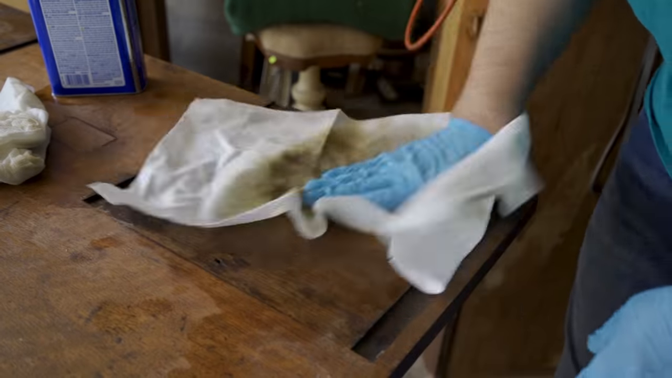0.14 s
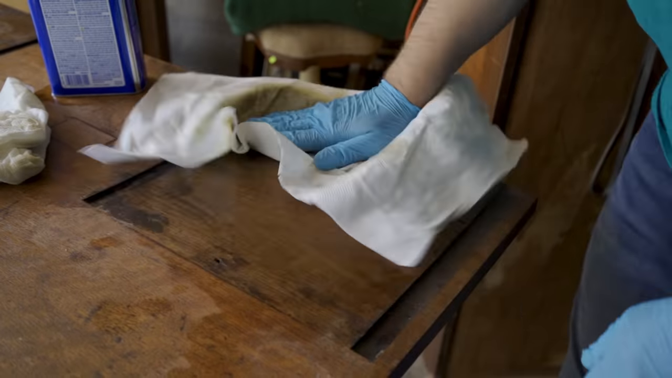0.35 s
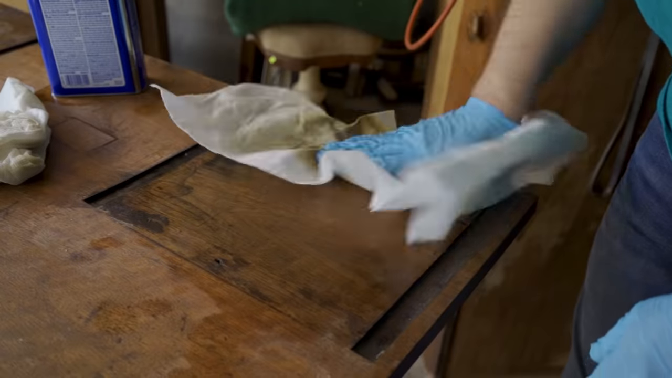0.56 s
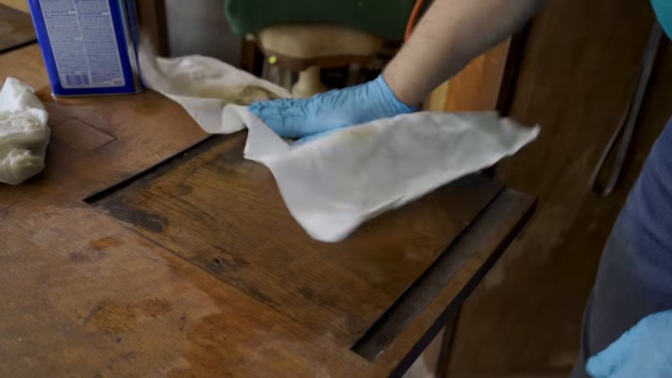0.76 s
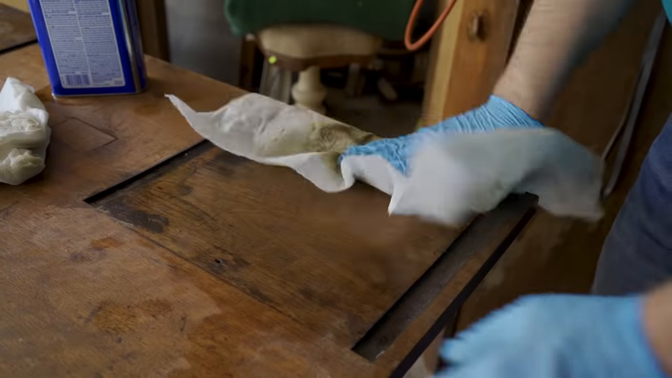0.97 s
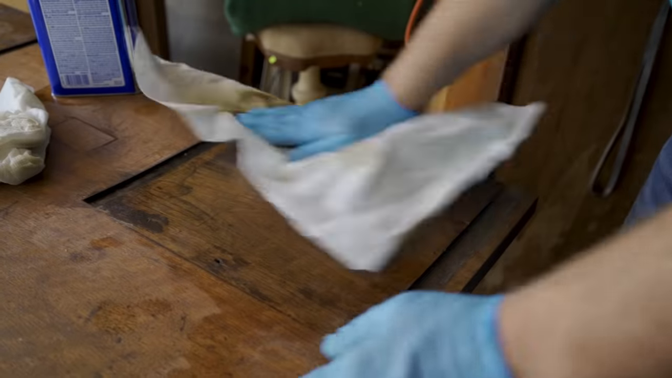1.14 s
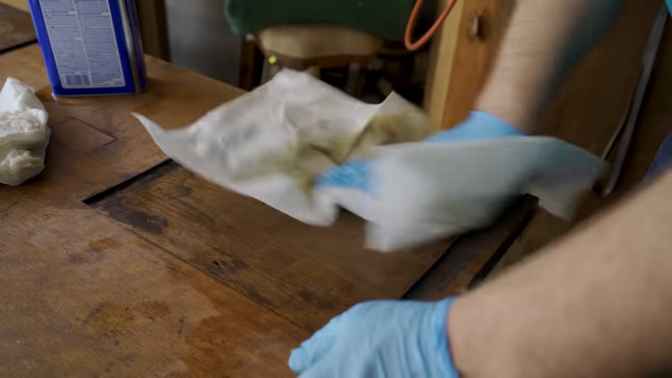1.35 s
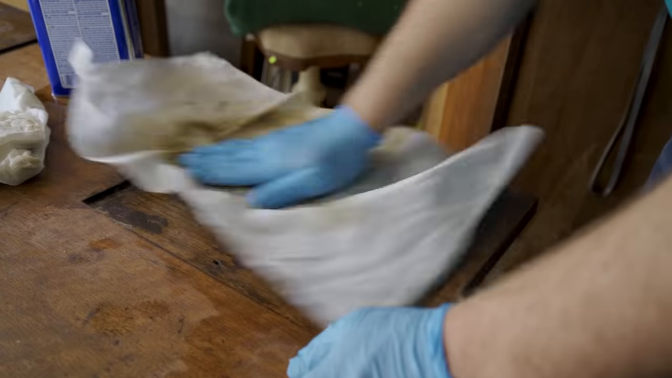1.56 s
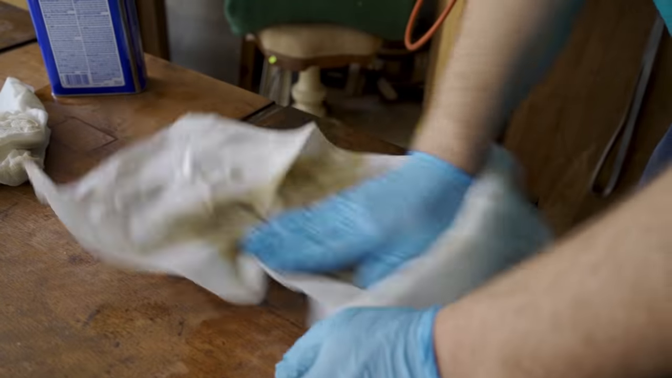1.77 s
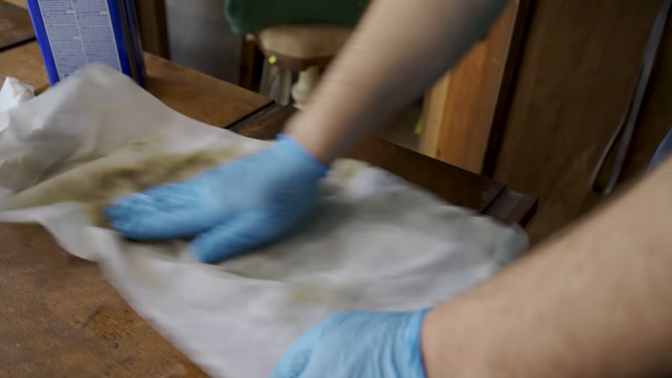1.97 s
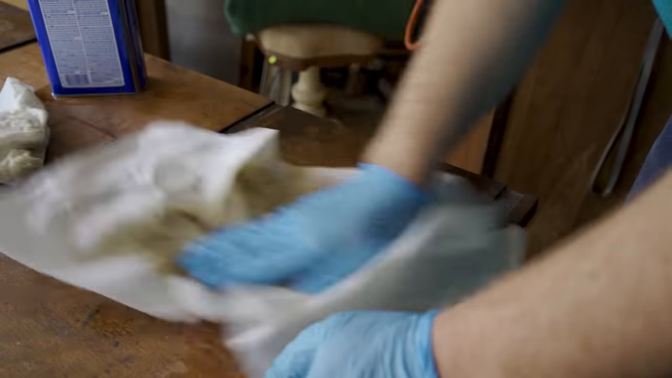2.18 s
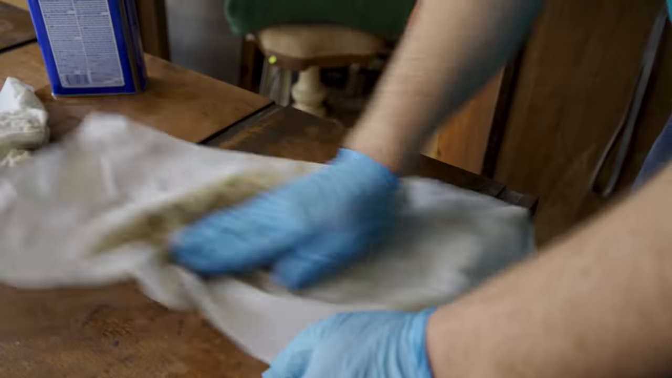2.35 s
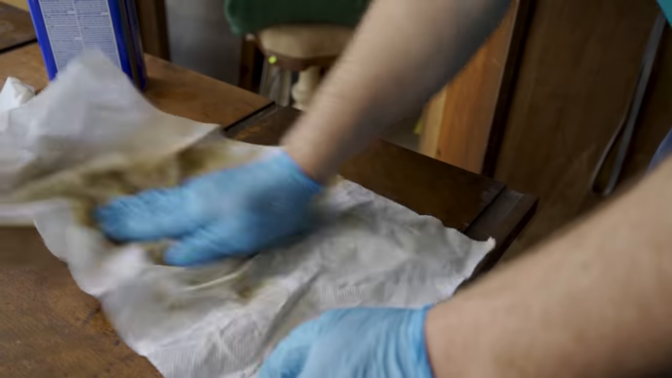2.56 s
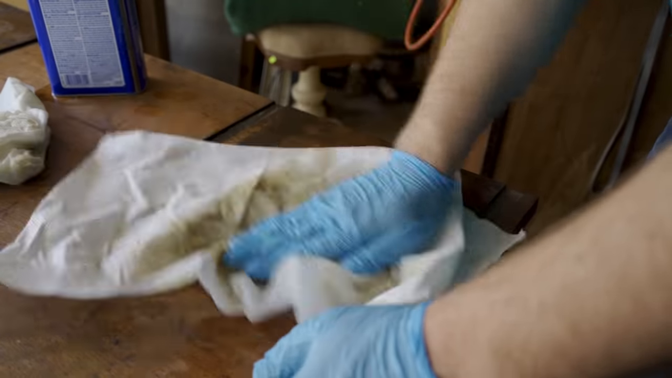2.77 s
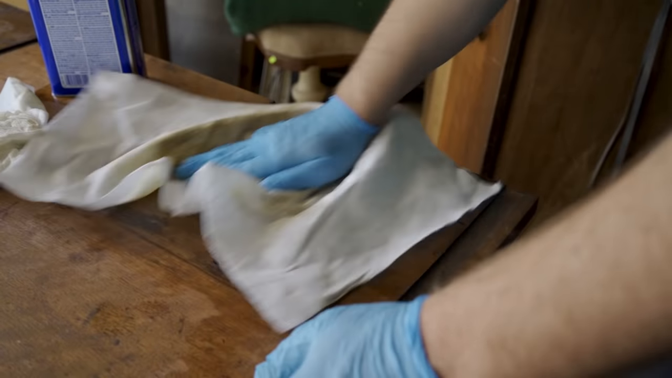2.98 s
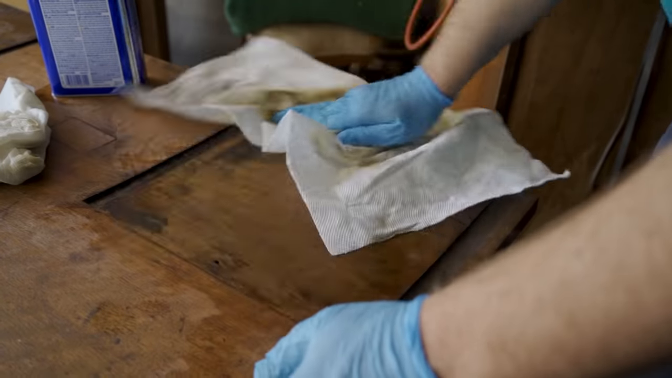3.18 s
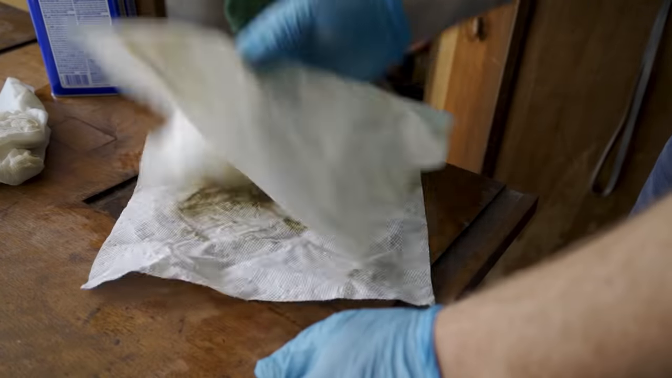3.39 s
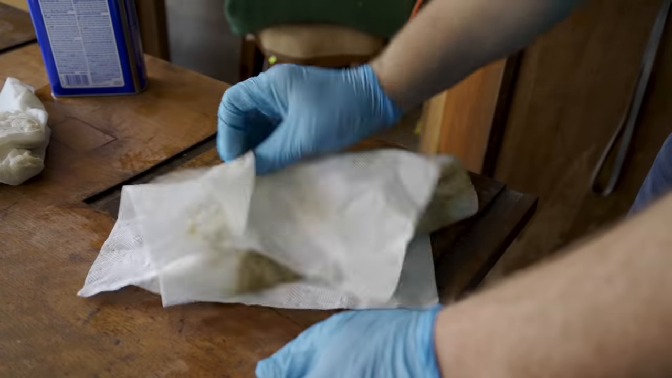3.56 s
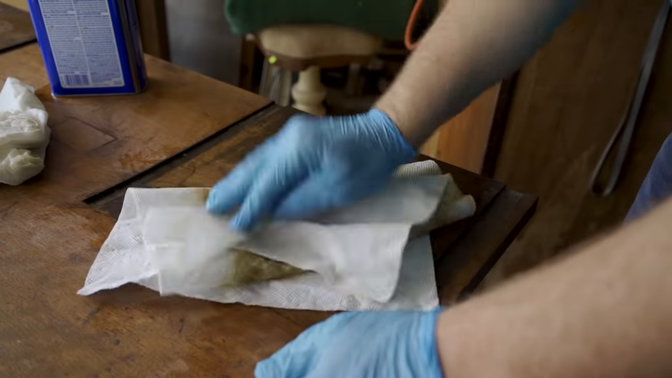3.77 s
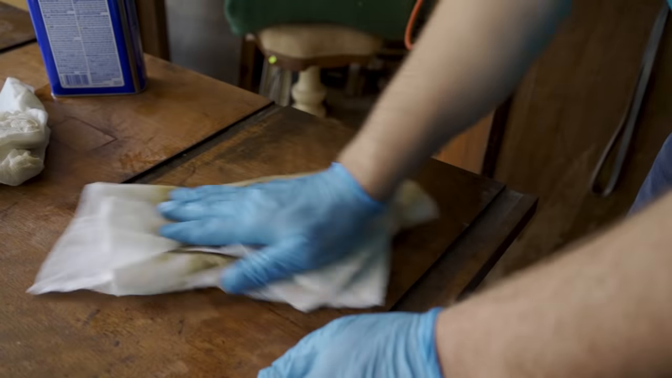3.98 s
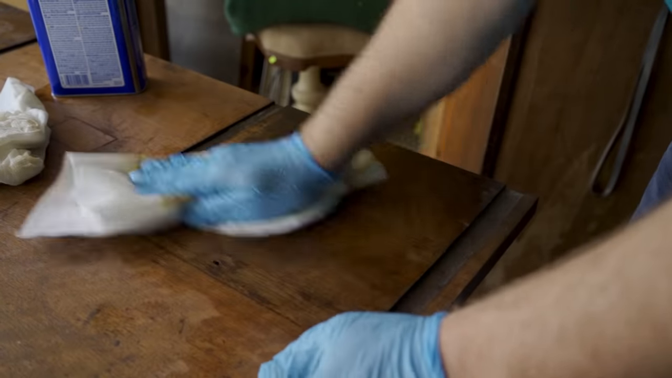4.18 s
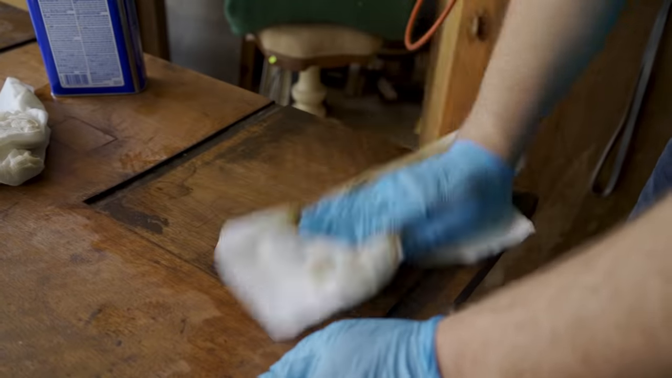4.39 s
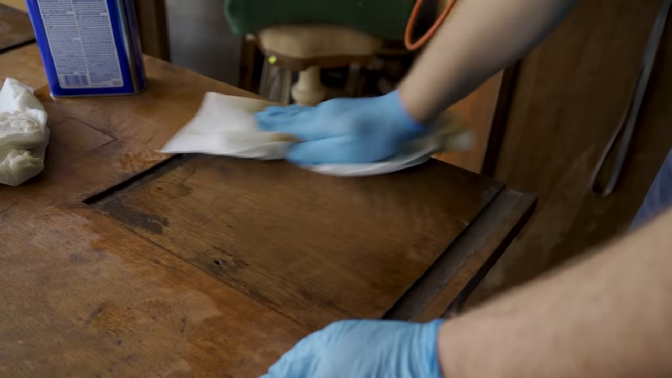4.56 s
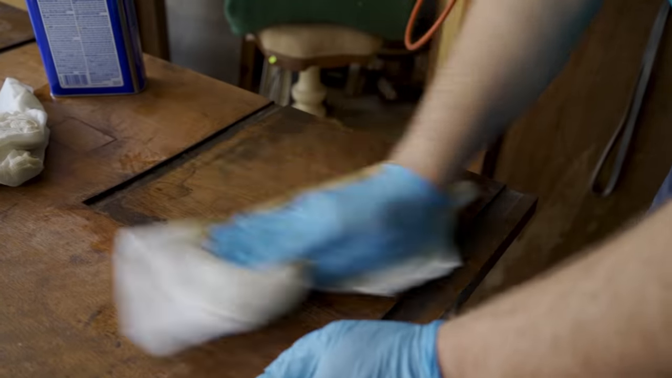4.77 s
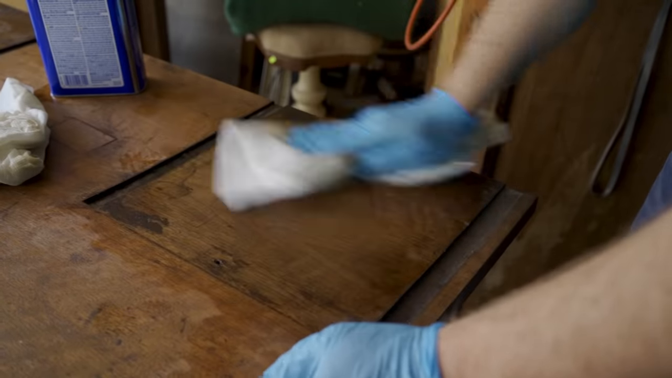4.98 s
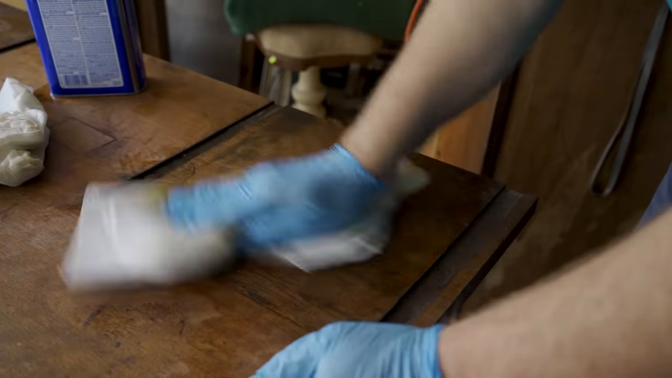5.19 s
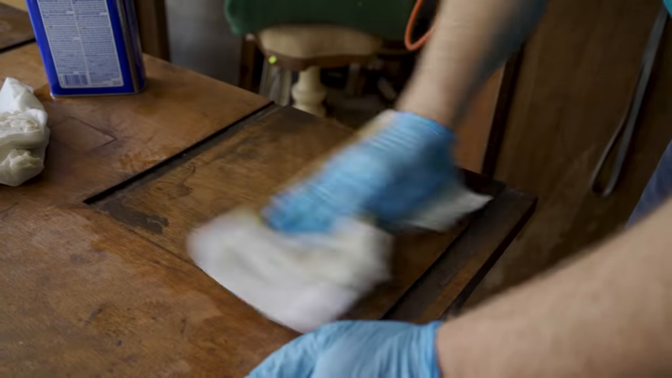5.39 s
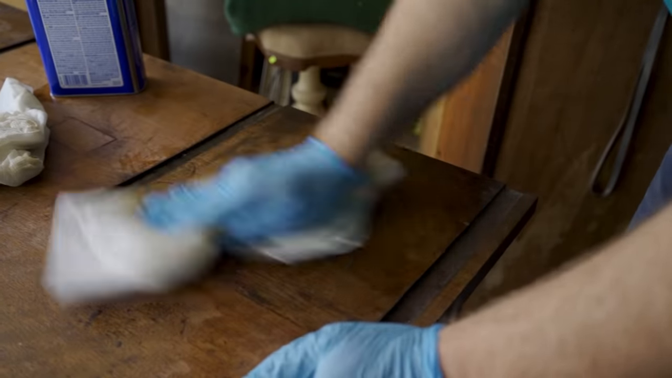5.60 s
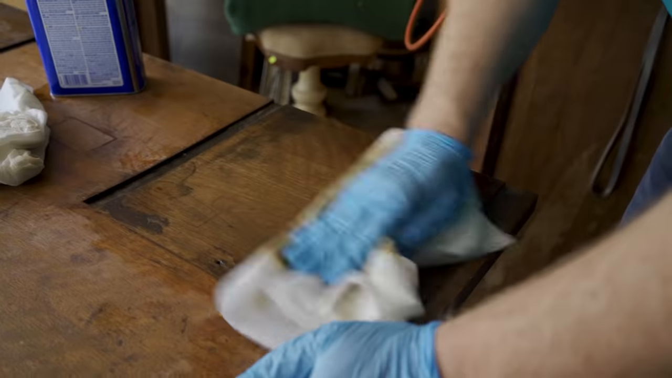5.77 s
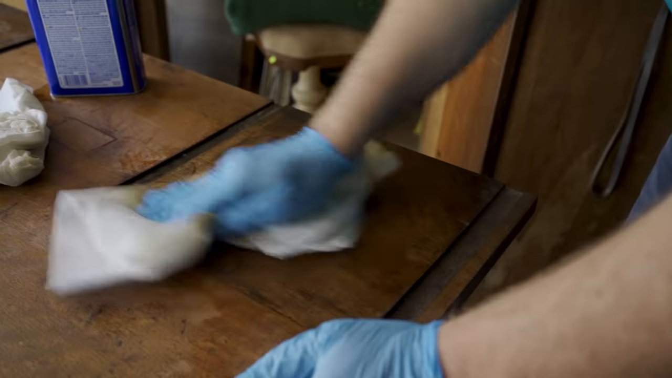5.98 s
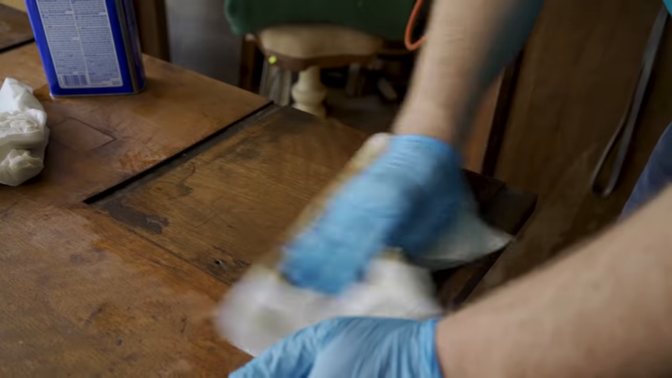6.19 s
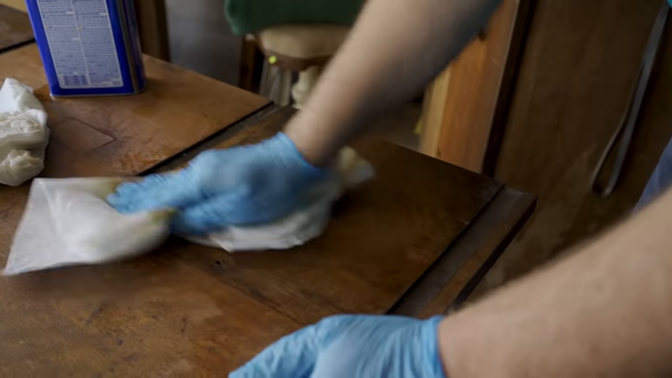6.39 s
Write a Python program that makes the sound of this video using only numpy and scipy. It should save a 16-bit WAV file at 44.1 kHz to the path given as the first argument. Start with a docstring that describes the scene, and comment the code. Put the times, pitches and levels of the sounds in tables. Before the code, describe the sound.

Close stereo pickup of a damp paper towel scrubbed over a wooden desk in quick, hissy, grainy strokes, about four a second. The loose lid rocks with hollow rising knocks and the board drones softly underneath. Rubbing stops abruptly midway; the paper ticks and puffs as it is folded, then scrubbing resumes, more hissy, ending in quicker strokes and a cluster of knocks. Small quiet workshop with a very faint hum.

```python
"""Damp paper towel on an old desk

Close to a stereo pair of microphones, a gloved hand scrubs a damp paper towel to and fro over a wooden desk.
The rubbing breaks off, the towel is folded, and it goes on: noise snaps, coloured as fibres catching on the
grain, follow the speed of each stroke. The board drones under the pad, and the loose desk lid rocks with
hollow knocks: rising blips that leave damped modes ringing. Folded paper ticks and puffs.
A small workshop answers, with still air, a faint mains hum, a narrow whirr and a thin whine."""
import sys
import numpy as np
from scipy import signal
from scipy.fft import rfft, irfft, next_fast_len
from scipy.io import wavfile
from scipy.ndimage import uniform_filter1d, map_coordinates

SR = 44100
rng = np.random.default_rng(int(sys.argv[2]) if len(sys.argv) > 2 else 0)


def unload_audio(sound):
    """Save the sound as a 16-bit wav file, at the path given as the first command line argument."""
    columns = np.transpose(np.atleast_2d(sound))
    # keep every value between -1 and 1, then stretch to whole-number steps
    steps = np.round(np.clip(columns, -1, 1) * 32767)
    wavfile.write(sys.argv[1], SR, steps.astype(np.int16))


N = 284031
TOP_HZ = 15800  # upper band limit of the recorder
STOP_S = 3.338  # the rubbing breaks off abruptly
HALF = np.array([[.5], [-.5]])  # shares a left-minus-right difference between the two microphones


def amp(db):
    """Decibels to gain."""
    return 10 ** (np.asarray(db) / 20)


def unit(x):
    """x at rms 1."""
    return x / np.sqrt(np.mean(x ** 2) + 1e-20)


def along(points, hz):
    """(Hz, value) points read on a log frequency axis."""
    f, v = np.transpose(points)
    return np.interp(np.log(hz + 1), np.log(f + 1), v)


def curves(rows):
    """One value per sample for each column after the time."""
    s, *columns = np.transpose(rows)
    return [np.interp(np.arange(N) / SR, s, column) for column in columns]


def wobble(rate):
    """A smooth random curve, rate knots a second."""
    knots = rng.standard_normal(int(N * rate / SR) + 4)
    fine = map_coordinates(knots, [np.arange(8 * len(knots)) / 8])  # spline, 8 points per knot
    return np.interp(np.arange(N) * rate / SR, np.arange(len(fine)) / 8, fine)


def arc(crest, rise, fall):
    """A quarter sine from rest up to 1 at the crest and another back to rest (all s)."""
    corners = [crest - abs(rise), crest, crest + abs(fall)]
    return np.sin(np.pi / 2 * np.interp(np.arange(N) / SR, corners, [0, 1, 0]))


def swelling(steady_db, swells):
    """The gain of a steady sound with a few swells on top, added in power."""
    extra = sum((amp(db) * arc(crest, rise, fall)) ** 2 for crest, rise, fall, db in swells)
    return np.sqrt(amp(steady_db) ** 2 + extra)


def filtered(x, response):
    """x passed through a response of frequency."""
    m = next_fast_len(N + SR // 2)
    return irfft(rfft(x, m) * response(np.fft.rfftfreq(m, 1 / SR)), m)[..., :N]


def shape(*spectra):
    """The gain of one or more dB spectra in a row."""
    return lambda hz: amp(sum(along(points, hz) for points in spectra))


def resonance(hz, centre_hz, width_hz):
    """Response of one damped mode."""
    return 1j * hz * width_hz / (centre_hz ** 2 - hz ** 2 + 1j * hz * width_hz)


def add(track, s, sound):
    """Mix a sound into the track at time s."""
    part = track[max(round(s * SR), 0):][:len(sound)]
    part += sound[:len(part)]


def spread(pair, colour):
    """Two unrelated signals become a coloured stereo pair of rms 1, alike in the bass."""
    # likeness of the two microphones: f/Hz, correlation (1 = identical)
    likeness = [(100, .995), (250, 1), (500, 0.87), (1000, 0.81), (2000, 0.74), (4000, 0.41), (8000, 0.067),
                (13000, .03)]

    def mid_side_gains(hz):
        turn = np.arccos(np.clip(along(likeness, hz), -1, 1)) / 2
        return colour(hz) * np.array([np.cos(turn), np.sin(turn)])

    mid, side = filtered(pair, mid_side_gains)
    return unit(np.array([mid + side, mid - side]))


def workshop(hum_hz=100, whine_hz=1520):
    """Still room air, the mains hum, a narrow fluttering whirr and a thin whine."""
    # swells of the hum: crest t/s, rise/s, fall/s, level/dB
    hum_swells = [(1.5, .45, 0.42, -82.5), (3.15, 1, .27, -77.5), (3.78, .17, .6, -83),
                  (5.15, .35, 0.65, -80)]
    # swells of the whirr before its trim: crest t/s, rise/s, fall/s, level/dB
    whirr_swells = [(2.02, .25, 0.32, -58.5), (2.48, .2, 0.14, -56.5), (2.74, 0.28, .15, -57.5),
                    (4.12, 0.087, 0.11, -60)]
    # spectrum of the still air: f/Hz, relative level/dB
    air_spectrum = [(20, -40), (45, -21), (70, -6), (110, -1), (200, -7.5), (500, -7), (1200, 6.5),
                    (3000, -4), (8000, -21), (16000, -18)]
    t = np.arange(N) / SR
    hum = swelling(-89, hum_swells) * np.sin(2 * np.pi * hum_hz * t)

    flutter = amp(-1.9 + 1.4 * wobble(24.14))
    band = spread(rng.standard_normal((2, N)), lambda hz: resonance(hz, centre_hz=1112, width_hz=210) ** 2)
    whirr = swelling(-73, whirr_swells) * flutter * band

    whine_gain = amp(-75.5 + 1.6 * wobble(4.6))
    whine = whine_gain * np.sin(2 * np.pi * whine_hz * t + 0.27 * wobble(19))
    air = amp(-68.3) * spread(rng.standard_normal((2, N)), shape(air_spectrum))
    return hum + whirr + whine + air


def room(x, echo_db, tail_db, echo_delay_s=.0123, wide_hz=650):
    """The direct sound, one slap from the ceiling and a short decaying tail, alike at both microphones in the bass."""
    # decay of the tail: f/Hz, t60/s
    decay = [(150, 0.11), (600, 0.12), (3000, 0.1), (12000, 0.2)]
    hz, t, z = signal.stft(rng.standard_normal((2, SR // 3)), SR, nperseg=256)
    width = np.array([np.ones_like(hz), np.minimum(hz / wide_hz, 1) ** 2])[:, :, None]
    fading = amp(-60 * t / along(decay, hz)[:, None])
    build_up = 1 - np.exp(-t / 0.0088)
    mid, side = signal.istft(z * width * fading * build_up, SR, nperseg=256)[1]
    tail = np.array([mid + side, mid - side])
    wet = signal.oaconvolve(x[None], tail / np.linalg.norm(tail[0]), axes=1)[:, :N]
    slap = np.pad(x, (round(echo_delay_s * SR), 0))[:N]
    return x + amp(echo_db) * slap + amp(tail_db) * wet


def bounced(x):
    """Short detours off the desk and nearby things ripple the spectrum."""
    # extra paths to the microphones: delay/s, gain
    paths = [(.0019, .06), (.0056, .08), (0.0117, .14)]
    return filtered(x, lambda hz: 1 + sum(gain * np.exp(-2j * np.pi * hz * delay) for delay, gain in paths))


def pats(tick_db=12, puff_t60_s=0.057):
    """Flaps of paper as the towel is folded over: a tick, then a short puff, through a broad resonance."""
    # pats, crinkles and catches, close by, before the room: t/s, peak level/dB, centre f/Hz
    flaps = [(3.556, -53, 1000), (3.559, -53, 2980), (3.598, -48.5, 1230), (3.618, -56, 5000),
             (3.65, -57, 1400), (3.676, -54.5, 1700), (3.856, -47.5, 6000), (4.118, -44, 1170)]
    track, t = np.zeros(N), np.arange(SR // 10) / SR
    hz = np.fft.rfftfreq(len(t), 1 / SR)
    for s, db, centre_hz in flaps:
        puff = rng.standard_normal(len(t)) * amp(-60 * t / puff_t60_s)
        tick = amp(tick_db) * (t == 0)
        flap = irfft(rfft(puff + tick) * resonance(hz, centre_hz, 0.83 * centre_hz) ** 2)
        add(track, s, amp(db) * flap / np.abs(flap).max())
    return track


def lid(low_hz=380, high_hz=880, fade_s=0.0062, lead_s=0.0029, thud_hz=290, thud_db=-15, click_db=-15):
    """Each knock is a hollow blip that rises in pitch, over a low thud and a dull click, and leaves the lid ringing."""
    # knocks of the lid before the room: t/s, level/dB, time the pitch takes to rise/s
    knocks = [(0.319, -54.5, .016), (0.482, -48, .011), (0.562, -51, 0.013), (0.744, -41, 0.012),
              (0.906, -42, 0.01), (1.007, -48.5, .02), (1.151, -40.5, .011), (1.317, -40.5, 0.0089),
              (1.482, -54.5, .012), (1.561, -43.5, .011), (1.827, -51.5, .014), (1.955, -52, 0.017),
              (2.244, -36.5, .009), (2.699, -42, .0104), (4.283, -54, .012), (5.797, -52, 0.012),
              (6.054, -46, 0.0092), (6.146, -45, 0.0095), (6.317, -44, 0.012), (6.382, -46, 0.0098)]
    # modes of the lid: f/Hz, level before scatter/dB, t60/s
    modes = [(333, -13, 0.16), (400.3, -16.5, 0.26), (464, -8.5, 0.26), (533, -30, 0.14),
             (617, -16.5, 0.46), (675, -14, 0.38), (788, -6, 0.25), (863, -36, 0.14)]
    track, t = np.zeros(N), np.arange(SR // 4) / SR
    dull = signal.butter(2, [850, 1500], "bandpass", fs=SR, output="sos")

    def swell(life):
        return (t / life) ** 2 * np.exp(1 - (t / life) ** 2)

    for s, db, rise in knocks:
        climb = np.minimum(t / max(rise, .003), 1)
        pitch = (low_hz + (high_hz - low_hz) * climb) * (1 + 0.061 * rng.normal())
        blip = np.sin(2 * np.pi * np.cumsum(pitch) / SR) * swell(fade_s)
        thud = amp(thud_db) * np.sin(2 * np.pi * (thud_hz * t + rng.random())) * swell(0.0067)
        click = unit(signal.sosfilt(dull, rng.standard_normal(len(t))))
        click = amp(click_db - 60 * t / 0.22) * click
        ring = np.zeros(len(t))
        for hz, level, t60 in modes:
            gain = amp(level + rng.normal(0, 1.65) - 60 * t / t60)
            ring += gain * np.sin(2 * np.pi * (hz * t + rng.random()))
        # the modes take over as the blip dies
        ring *= 1 - np.exp(-(t / fade_s) ** 2)
        add(track, s - lead_s, amp(db) * (blip + thud + click + ring))
    return track


def slips(rate, size_db, blur_db):
    """Countless tiny fibre slips: single snaps of uneven size over a blur of smaller ones."""
    happens = rng.random(N) < rate / SR  # rate in snaps a second
    sizes = amp(size_db * np.minimum(rng.exponential(size=N), 4))
    snaps = unit(happens * sizes * rng.standard_normal((2, N)))
    return unit(snaps + amp(blur_db) * rng.standard_normal((2, N)))


def patchy(pair, depth_db):
    """Shifting folds of the paper favour ever new bands."""
    z = signal.stft(pair, nperseg=512)[2]
    field = rng.standard_normal(z.shape[1:])
    field = uniform_filter1d(field, size=6, axis=0)  # smooth over frequency
    field = uniform_filter1d(field, size=14, axis=1)  # smooth over time
    return signal.istft(z * amp(depth_db * unit(field)), nperseg=512)[1][:, :N]


def board(rub_db):
    """The rubbed wood drones, swelling with each stroke."""
    # drone under the pad before swell and trim: t/s, level/dB
    drone_level = [(0.0, -70), (1.0, -65), (1.45, -64), (2.2, -68), (2.45, -62), (2.9, -71), (3.15, -70),
                   (3.8, -75.5), (4.55, -69.5), (5.1, -71.5), (6.15, -66), (6.44, -64)]
    # spectrum of the drone: f/Hz, relative level/dB
    wood_spectrum = [(60, -43), (130, -9), (190, -5.5), (240, -4.5), (330, 0.5), (600, -0.5), (850, 1.5),
                     (1300, -12.5), (3000, -49)]
    swell_db = rub_db - uniform_filter1d(rub_db, size=SR // 3)
    drone = bounced(spread(slips(rate=300, size_db=2.0, blur_db=6), shape(wood_spectrum)))
    return amp(curves(drone_level)[0] + 0.35 * swell_db + 2.5) * drone


def strokes(rub_power=0.8, hiss_power=1.01):
    """Rubbing, fibre hiss and drag in dB: each grows as a power of hand speed; overlapping strokes add in power."""
    # strokes of the hand, light ones while it folds the towel; where they overlap it circles without stopping:
    # fastest moment t/s, speeding up/s, slowing down/s, rubbing level before trim/dB,
    # fibre hiss over the rubbing before trim/dB, dull drag over the rubbing/dB
    hand = [(0.066, 0.11, 0.27, -52.5, -3.5, -13), (0.344, 0.11, 0.091, -46.5, -6.5, -14),
            (0.584, 0.13, 0.083, -49.5, -5, -14.5), (0.761, 0.11, 0.11, -48, -4.5, -11),
            (0.983, .12, 0.078, -46.5, -5, -10), (1.197, .14, 0.082, -49, -3.5, -7.5),
            (1.337, .07, 0.13, -47, -4.5, -11.5), (1.637, .18, .075, -51, -4, -7),
            (1.774, 0.093, .125, -50.5, -4.5, -10.5), (2.064, .175, 0.057, -48, -4, -12),
            (2.228, 0.098, .115, -49.5, -5, -8), (2.483, 0.15, .087, -48, -4, -4.5),
            (2.68, 0.089, 0.16, -51.5, -3.5, -7), (2.933, 0.16, 0.11, -51, -4, -8),
            (3.14, 0.2, 0.24, -51, -4.5, -6.5), (3.61, 0.096, .15, -69, -7, 0),
            (3.884, 0.12, .11, -65.5, -8.5, -2), (4.04, 0.1, 0.11, -56.5, -6, -6),
            (4.176, 0.14, 0.057, -48, -5.5, -7.5), (4.32, .1, 0.21, -49, -4.5, -11),
            (4.566, 0.19, 0.16, -50, -3, -11), (4.703, .078, 0.097, -47, -5, -9),
            (4.833, 0.19, 0.37, -51, -1.5, -13), (5.23, 0.24, 0.13, -47.5, -3, -7),
            (5.34, 0.063, 0.098, -50, -1.5, -10), (5.46, .12, 0.19, -55.5, 1, -8.5),
            (5.585, 0.062, 0.057, -49.5, -4, -5), (5.675, 0.064, 0.062, -48.5, -3, -3),
            (5.765, 0.099, 0.079, -49.5, -2, -7), (5.89, 0.071, .07, -53, .5, -11),
            (5.98, 0.084, 0.043, -50.5, -2.5, -5.5), (6.145, 0.14, 0.088, -49, -2, -5.5),
            (6.335, 0.11, .12, -47.5, -1, -12)]
    # what still rubs between strokes (rubbing, hiss, drag dB): before the break, and quieter after it
    before_break_db, after_break_db = (-63, -69.5, -69), (-75.5, -79, -75)
    before = np.arange(N) / SR < STOP_S
    power = amp(np.where(before, np.c_[list(before_break_db)], np.c_[list(after_break_db)])) ** 2
    for crest, rise, fall, db, hiss_db, drag_db in hand:
        speed = arc(crest, rise, fall) * (before == (crest < STOP_S))  # no stroke crosses the break
        moving = speed > 0
        rub, hiss = speed[moving] ** rub_power, speed[moving] ** hiss_power
        layers = np.array([rub, amp(hiss_db) * hiss, amp(drag_db) * rub])
        power[:, moving] += (amp(db) * layers) ** 2
    return 10 * np.log10(power)


def towel(rub_db, fine_db, drag_db):
    """Paper fibres slip over the grain; the pad judders a little as it goes."""
    # where the towel is between the microphones: t/s, left minus right level/dB
    place = [(0.0, -.3), (0.3, -1), (1.5, -.6), (1.75, 0.7), (2.65, 1.2), (2.9, -.2), (4.25, 1),
             (4.48, -1.3), (4.75, 1), (4.98, -1.5), (5.25, 1), (5.45, -0.5), (5.63, 1.2), (6.44, .4)]
    # spectra of the paper, coarse rubbing, fine hiss and dull drag: f/Hz, relative level/dB
    paper_spectrum = [(410, -42), (700, -12), (767, 1), (945, -27), (1050, 1.5), (1310, -1.5), (1660, -2.5),
                      (1840, -3.5), (2210, -1), (5220, -1.5), (7130, -4), (9500, -13), (12000, -8),
                      (14200, -8), (15800, -14)]
    coarse_spectrum = [(700, -20), (1200, -6), (1600, 0), (4500, -1.5), (6500, -4.5), (9000, -4),
                       (16000, -24)]
    fine_spectrum = [(3500, -42), (6000, -1.5), (7500, -1), (8500, -3), (9500, -1.5), (10500, -5.5),
                     (12000, -7.5), (14000, -6.5), (16000, -10.5)]
    drag_spectrum = [(300, -38), (600, -14), (900, -4.5), (1200, -2), (1500, -3.5), (2000, -7), (4000, -25)]
    judder = amp(0.46 * wobble(17) + 0.53 * wobble(45) + 0.15 * wobble(220))

    rub = patchy(slips(rate=2000, size_db=0.0, blur_db=6.5), depth_db=1.27)
    rub = amp(rub_db + 1.47) * bounced(spread(rub, shape(paper_spectrum, coarse_spectrum)))
    fine = patchy(slips(rate=3000, size_db=0.5, blur_db=9.5), depth_db=1.34)
    fine = amp(fine_db + 4.5) * spread(fine, shape(fine_spectrum))
    drag = patchy(slips(rate=760, size_db=3.0, blur_db=5), depth_db=3.0)
    drag = amp(drag_db) * spread(drag, shape(drag_spectrum))
    return judder * (rub + fine + drag) * amp(HALF * curves(place)[0])


def scene():
    """Workshop, folding, knocks and rubbing, as the two microphones hear them."""
    # balance of the rubbing: f/Hz, left minus right level/dB
    lean = [(200, 0), (500, 1), (1000, 2), (2000, -1), (4000, 0), (8000, -2.5), (12000, 0.5), (16000, 3.5)]
    # phase of the rubbing: f/Hz, lead of the left microphone/rad
    lead = [(500, 0.082), (2500, 0.62), (5000, 0.025), (8000, 1.14), (15000, 1.1)]

    def rubbing_path(hz):
        return amp(HALF * along(lean, hz)) * np.exp(1j * HALF * along(lead, hz))

    def lid_path(hz):
        # the lid lies a little to the left: louder there, and 80 microseconds earlier
        louder = amp(HALF * along([(250, 0.83), (600, 1.7)], hz))
        return louder * np.exp(2j * np.pi * hz * HALF * 8e-5)

    rub_db, fine_db, drag_db = strokes()
    folding = room(pats(), echo_db=-14, tail_db=-7)
    knocks = filtered(room(lid(), echo_db=-7.0, tail_db=-3.5), lid_path)
    rubbing = filtered(towel(rub_db, fine_db, drag_db) + board(rub_db), rubbing_path)
    return workshop() + folding + knocks + rubbing


def record(dry):
    """The recorder keeps nothing above its band limit."""
    return filtered(dry, lambda hz: hz < TOP_HZ)


dry = scene()
out = record(dry)
unload_audio(out)
```